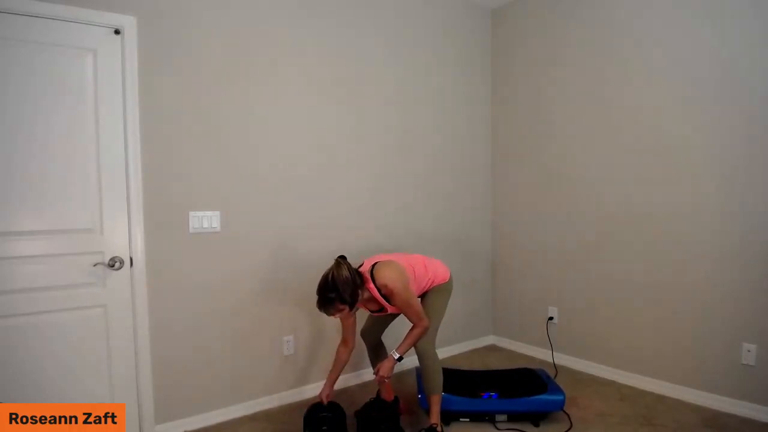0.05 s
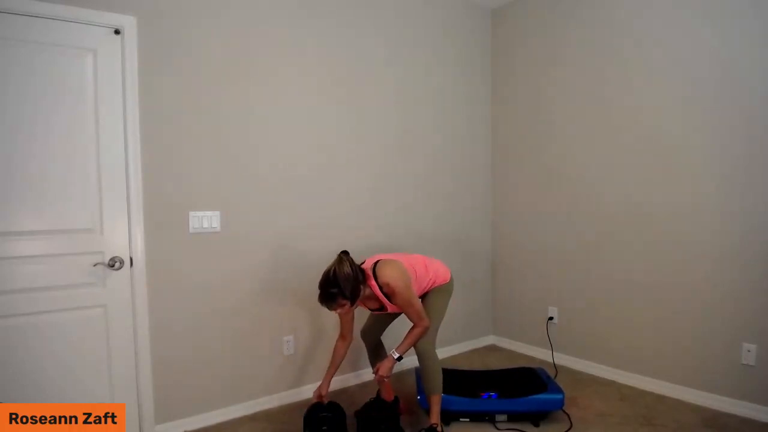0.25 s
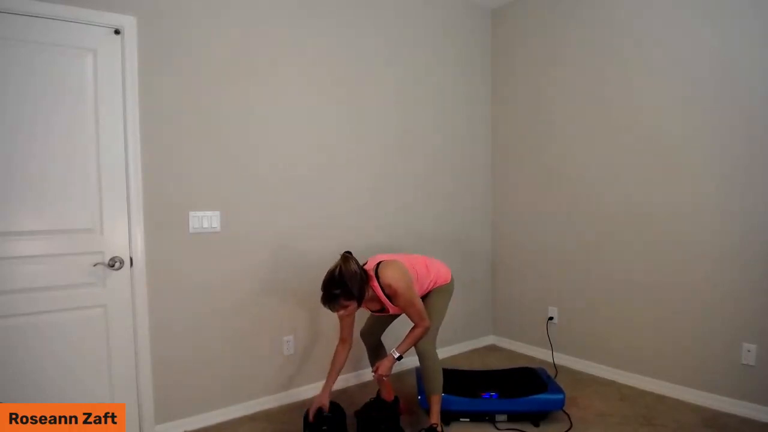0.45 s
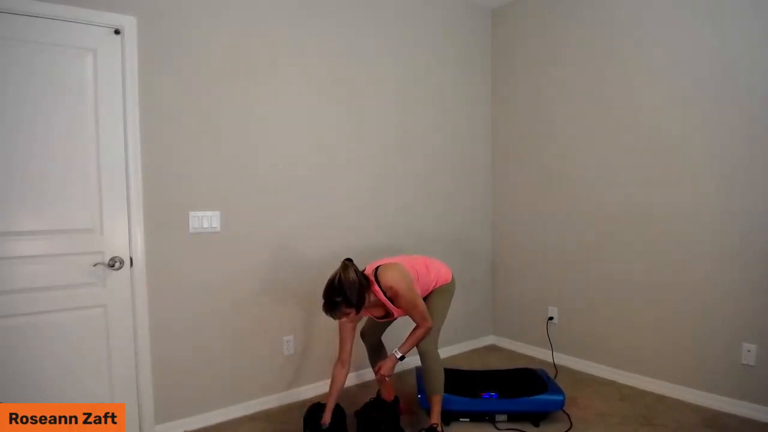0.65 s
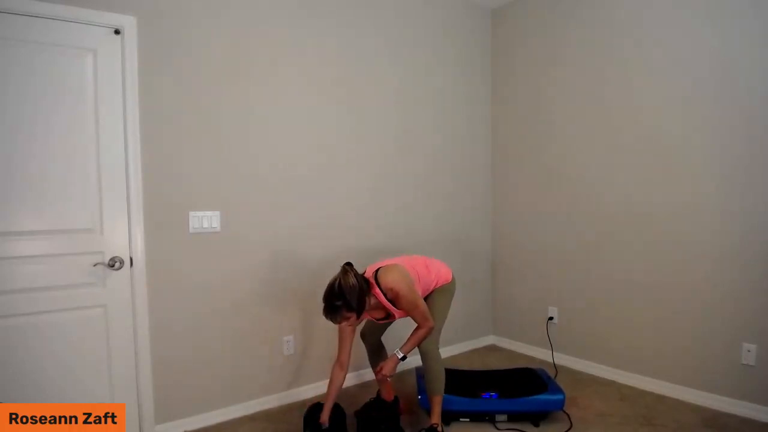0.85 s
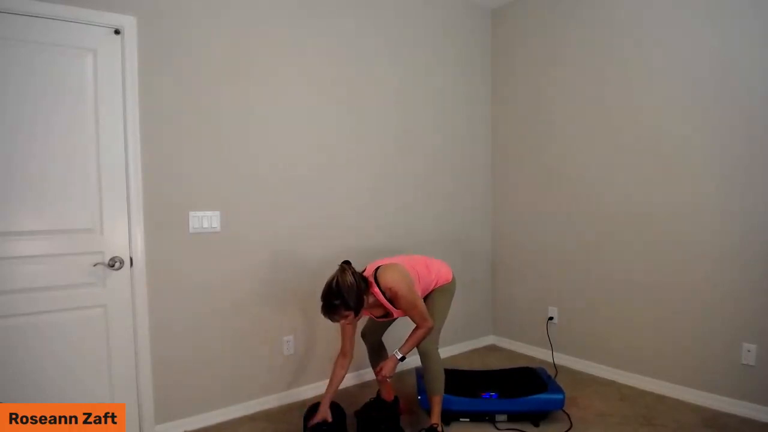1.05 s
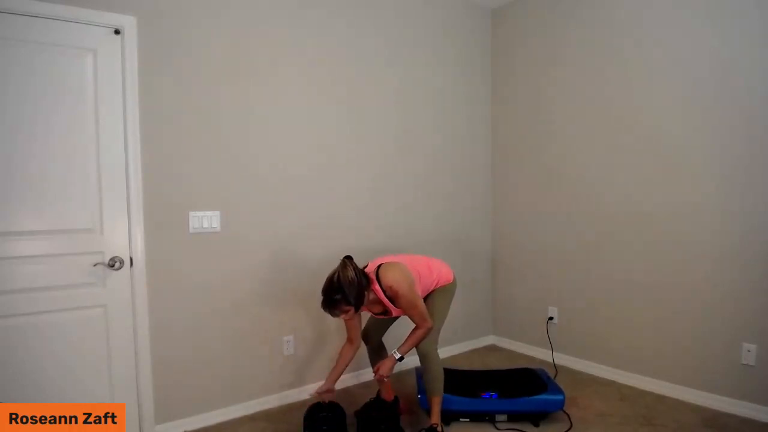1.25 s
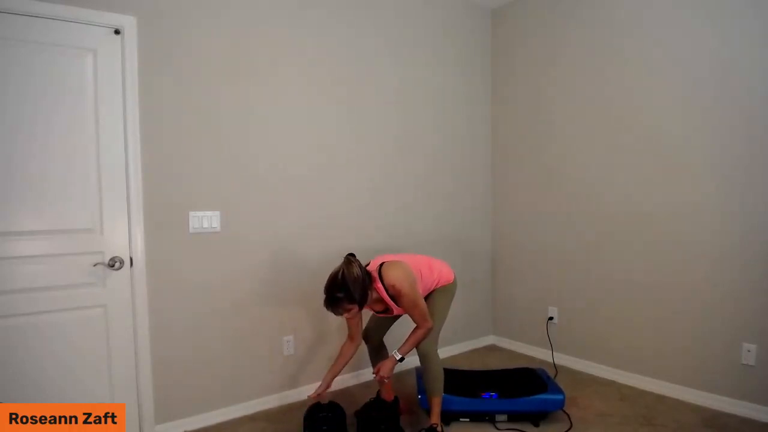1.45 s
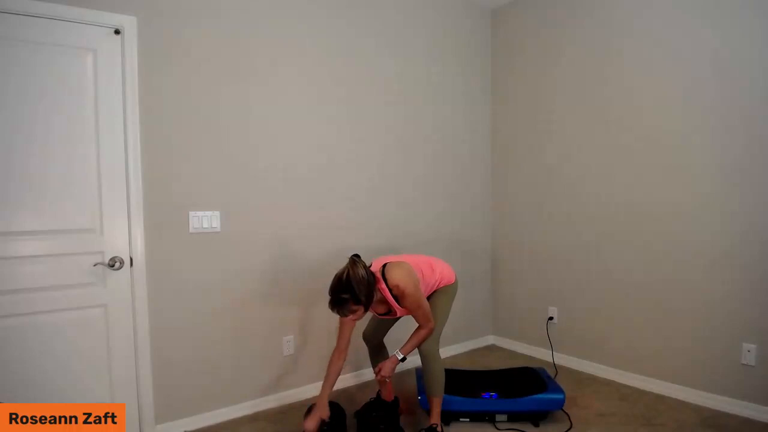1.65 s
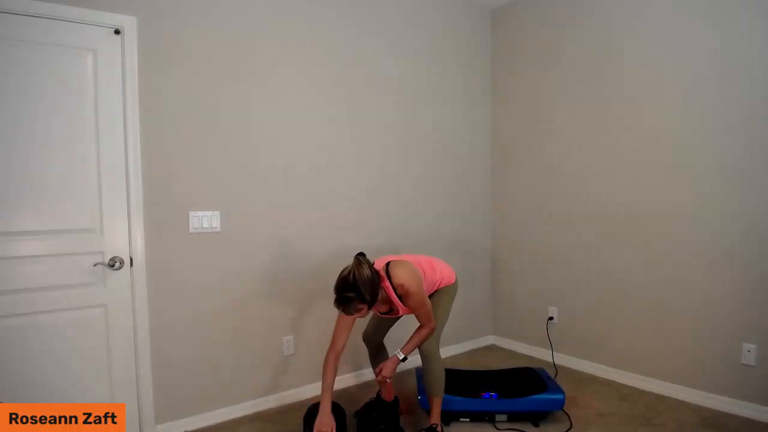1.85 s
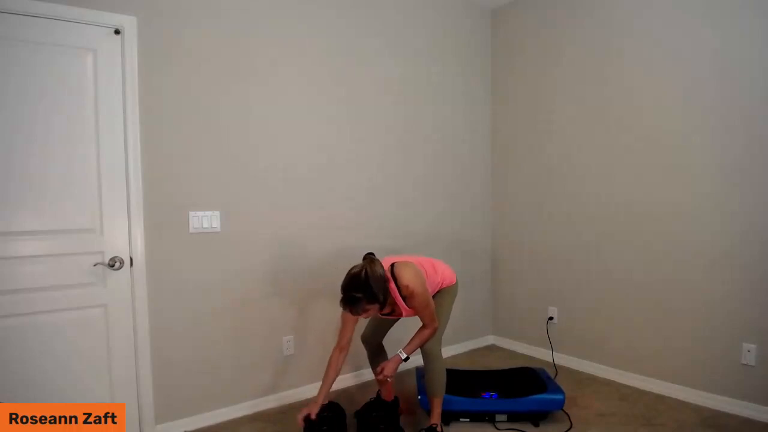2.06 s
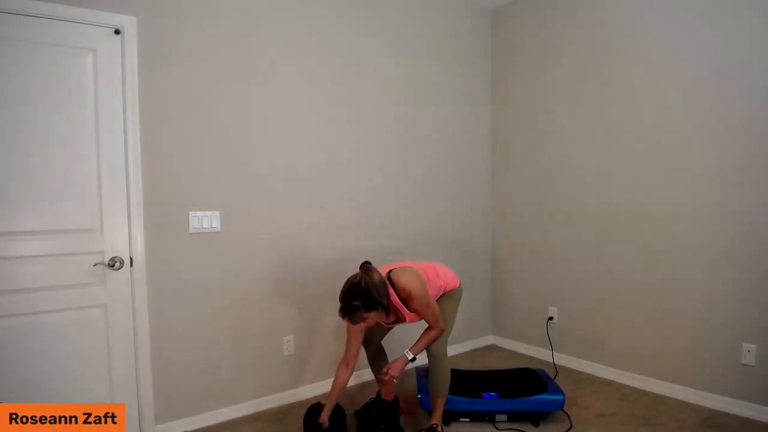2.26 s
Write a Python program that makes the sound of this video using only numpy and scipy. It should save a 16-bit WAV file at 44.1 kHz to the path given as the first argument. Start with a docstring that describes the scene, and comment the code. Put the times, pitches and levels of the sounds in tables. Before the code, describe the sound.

Hard plastic-and-steel clicks of a dumbbell weight selector, a few metres from the microphone in an empty echoing room; soft ticks between, the last two snaps loudest, echoes trimmed by noise suppression, very faint hush beneath.

```python
"""Dumbbell dial in a bare room

The selector dial of an adjustable dumbbell turns in its cradle, a few metres off in a bare, echoing room.
Each detent is a quick cluster of plastic-and-steel contacts: chattering noise that cracks and rings the body.
Faint tones with an octave above squeak between them; dull decaying sines thump through the floor.
The dial's echoes are dying noise; the recorder's noise suppressor shortens the quiet end of every echo.
A low, flickering background hush lies under it all, and the top of the treble is cut."""
import sys
import numpy as np
from scipy import signal
from scipy.fft import rfft, irfft
from scipy.io import wavfile
from scipy.ndimage import uniform_filter1d

SR = 44100
rng = np.random.default_rng(int(sys.argv[2]) if len(sys.argv) > 2 else 0)


def persist_wave(psi):
    """Save psi, clipped to +-1, as 16-bit WAV."""
    counts = np.round(np.clip(psi, -1, 1) * 32767).astype(np.int16)
    wavfile.write(sys.argv[1], SR, np.atleast_2d(counts).T)


N = 101738  # length [samples]

# Contacts of plastic and steel at the dial: (time [s], strength at each of the four CONTACT_HZ [dB],
# ring of the body against the crack [dB], favoured mode [Hz])
CONTACTS = [(.258, -45, -33.5, -17, -29, -46.5, 2440), (.2655, -24.5, -7.5, -6, -9.5, -37.5, 2740),
            (.284, -12.5, -17.5, -25, -11.5, -26.5, 926), (.3, -26.5, -32.5, -18.5, -25, -35.5, 584),
            (.444, -45.5, -36, -38.5, -37.5, -18.5, 2050), (.53, -39.5, -22, -34, -34, -34.5, 2560),
            (.544, -32, -39.5, -18.5, -36, -30, 2760), (.566, -36.5, -31, -50, -30.5, -25, 1490),
            (.6, -40.5, -58, -59, -63, -26, 3100), (.835, -27, -55, -41.5, -70, -40.5, 530),
            (.911, -34.5, -34.5, -25, -34.5, -33, 2260), (.919, -20.5, -17.5, -21.5, -17, -26, 1285),
            (.926, -23, -40, -13, -29, -41.5, 530), (.955, -18, -41, -35, -30.5, -33, 530),
            (1.451, -27.5, -14.5, -29, -18.5, -24, 1490), (1.458, -3.5, 2.5, -3, -2.5, -36, 2660),
            (1.464, -18.5, -12, -15, -11.5, -25.5, 3640), (1.55, -14.5, -32, -28.5, -23, -37, 708),
            (1.903, -60.5, -45, -30, -43.5, -42, 1990), (1.909, -28.5, -6, -64, -26, -29, 1285),
            (1.914, -1.5, 3, 0.5, -6.5, -35.5, 2370), (1.923, -5.5, -7.5, -16, -6, -27.5, 727)]
# Where each contact's four strengths apply: (frequency [Hz])
CONTACT_HZ = [650, 1400, 2700, 8000]
# Modes that plates and cradle ring with: (frequency [Hz], relative level [dB], time to fall 60 dB [s])
BODY_MODES = [(530, -2, .06), (624, -1, .05), (708, -1, .06), (926, -6, .15), (1285, -4, .07),
              (1490, -4, .05), (2050, -4, .05), (2280, -3, .04), (2440, -3, .05), (2560, -3, .05),
              (2860, -5, .04), (3050, -7, .06), (3280, -5, .07), (3640, -8, .04)]
# Colour of crack and ring as they radiate: (frequency [Hz], relative level [dB])
RADIATION = [(60, -39.5), (300, -18), (420, -7), (520, 11), (800, 13.5), (1000, 8.5), (1800, 9.5),
             (2400, 15), (3500, 11), (5300, 5.5), (6500, 7.5), (8000, -1), (11000, -2.5), (16000, -9)]
# Squeaks of the mechanism: (start [s], rise [s], hold [s], pitch [Hz], level [dB], octave above pitch [dB])
SQUEAKS = [(1.06, .025, .055, 1385, -48, 0), (1.66, .13, .04, 1399, -66, 23)]
# Dull thumps through the floor: (time [s], level [dB])
THUMPS = [(.285, -46.5), (.93, -58), (1.457, -56.5), (1.914, -25.5)]
# Echo time of the room: (frequency [Hz], time to fall 60 dB [s])
ROOM_T60 = [(100, 0.41), (250, 1), (600, 0.44), (2000, 0.67), (5000, 0.38), (8000, 0.38), (12000, 0.44),
            (16000, 0.17)]
# Colour of the room's background: (frequency [Hz], relative level [dB per Hz])
HUSH_COLOUR = [(15, -59), (25, -37.5), (59, -27), (115, -5), (293, -10), (383, -18.5), (475, -11.5),
               (811, -22), (879, -20), (2700, -27.5), (15000, -60.5)]
# Level under which the suppressor starts to cut: (frequency [Hz], level [dB per half octave])
GATE = [(200, -42.5), (700, -50.5), (2500, -33.5), (6000, -85.5), (14000, -35.5)]

# Tiny impacts swell up to each contact, then die
CHATTER_PER_S, CHATTER_SPREAD_DB = 2500, 4.5
CHATTER_LEAD_S, CHATTER_DECAY_S = 0.0016, 0.0015  # time constants
CRACK_DB, MODE_SPREAD_DB = 9, 2.5
# Modes away from the favoured one are struck less, down to a limit
FALL_DB_PER_OCTAVE, FALL_MOST_DB = 50, 13
SQUEAK_FALL_S, SQUEAK_WOBBLE = 0.03, 0.0015  # time constant; pitch spread as a fraction
THUMP_HZ, THUMP_DECAY_S = 120, 0.004
ROOM_DB, ROOM_BUILD_S = 7.5, 0.0081
EARLY_DB, EARLY_S = 13, 0.022  # extra level of the first echoes, and its fading time constant
HUSH_DB, HUSH_FLICKER_DB, HUSH_SWELL_DB = -63, 2, 2
GATE_SLOPE, GATE_SMOOTH_S = 0.63, 0.01  # dB of cut per dB of shortfall; level averaging time
CEILING = 1.3  # amplitude the rounded peaks approach
CUTOFF_HZ = 16350


def detents():
    """Each contact's chatter drives a broad crack and the modes, struck a little differently every time."""
    size, lead = 16384, 1024  # samples per contact, and those ahead of it
    out = np.zeros(N)
    t = np.arange(size) / SR
    hz = np.arange(size // 2 + 1) * SR / size
    modes = np.array([rfft(from_db(db - 60 * t / t60) * np.sin(2 * np.pi * f * t))
                      for f, db, t60 in BODY_MODES])
    mode_hz = np.array(BODY_MODES)[:, 0]
    radiation = causal(np.log(from_db(CRACK_DB + at_hz(RADIATION, hz))))
    since = t - lead / SR
    shape = np.exp(np.where(since < 0, since / CHATTER_LEAD_S, -since / CHATTER_DECAY_S))
    for s, *strength, ring_db, favoured_hz in CONTACTS:
        impacts = rng.random(size) < CHATTER_PER_S / SR
        hits = impacts * from_db(CHATTER_SPREAD_DB * rng.standard_normal(size))
        hits = hits * rng.choice([-1, 1], size) * shape
        colour = causal(np.log(from_db(at_hz(list(zip(CONTACT_HZ, strength)), hz))))
        octaves_away = np.abs(np.log2(mode_hz / favoured_hz))
        away_db = np.minimum(FALL_DB_PER_OCTAVE * octaves_away, FALL_MOST_DB)
        mode_db = ring_db - away_db + MODE_SPREAD_DB * rng.standard_normal(len(BODY_MODES))
        ring = from_db(mode_db) @ modes
        contact = even(hits, width_hz=210) * colour * radiation * (1 + ring)
        add(out, irfft(contact), s - lead / SR)
    return out


def squeaks():
    """A thin stick-slip tone and its octave swell, hold and die."""
    out, t = np.zeros(N), np.arange(N) / SR
    wobble = 1 + SQUEAK_WOBBLE * drift(33)
    for s, rise, hold, hz, db, octave_db in SQUEAKS:
        swell = np.clip((t - s) / rise, 0, 1) ** 2
        fall = np.exp(-np.maximum(t - s - rise - hold, 0) / SQUEAK_FALL_S)
        phase = 2 * np.pi * hz * np.cumsum(wobble) / SR
        tone = np.sin(phase) + from_db(octave_db) * np.sin(2 * phase)
        out += from_db(db) * swell * fall * tone
    return out


def thumps():
    """Each thump is one damped low push."""
    out, t = np.zeros(N), np.arange(SR // 10) / SR
    push = np.sin(2 * np.pi * THUMP_HZ * t) * np.exp(-t / THUMP_DECAY_S)
    for s, db in THUMPS:
        add(out, from_db(db) * push, s)
    return out


def room(x):
    """Dense echoes build up fast and die band by band, the early ones stronger."""
    t, echo = np.arange(N) / SR, 0
    onset = (1 - np.exp(-t / ROOM_BUILD_S)) * from_db(EARLY_DB * np.exp(-t / EARLY_S))
    for hz, band in bands(rng.standard_normal(N)):
        echo = echo + band * onset * from_db(-60 * t / at_hz(ROOM_T60, hz))
    response = from_db(ROOM_DB) * irfft(even(echo, width_hz=75), N)
    return signal.fftconvolve(x, response)[:N]


def hush():
    """The room's background swells as a whole, most in the treble, and flickers band by band."""
    noise = bands(rng.standard_normal(N))
    swell_db = HUSH_SWELL_DB * drift(5.4)
    background = np.zeros(N)
    for hz, band in noise:
        swell_share = min(hz / 1500, 1)
        level_db = at_hz(HUSH_COLOUR, hz) + swell_share * swell_db + HUSH_FLICKER_DB * drift(20)
        background += band * from_db(level_db)
    return from_db(HUSH_DB) * rms_one(background)


def suppress(x):
    """The noise suppressor turns each band down by a share of its shortfall under the gate."""
    out = np.zeros(N)
    for hz, band in bands(x):
        power = uniform_filter1d(band ** 2, int(GATE_SMOOTH_S * SR))
        level_db = 10 * np.log10(np.maximum(power, 1e-16))
        out += band * from_db(GATE_SLOPE * np.minimum(level_db - at_hz(GATE, hz), 0))
    return out


def from_db(db):
    """Decibels to gain."""
    return 10 ** (np.asarray(db) / 20)


def rms_one(x):
    """Scale to unit rms."""
    return x / np.sqrt(np.mean(x ** 2) + 1e-20)


def at_hz(points, hz):
    """Read a table on a log-frequency axis."""
    table_hz, values = np.array(points)[:, 0], np.array(points)[:, 1]
    return np.interp(np.log(np.maximum(hz, 1)), np.log(table_hz), values)


def add(out, x, s):
    """Mix a sound in at a time in seconds."""
    i = int(s * SR)
    out[i:i + len(x)] += x[:N - i]


def drift(rate_hz):
    """Slow random wander of unit rms: noise through a two-pole low-pass."""
    r = np.exp(-2 * np.pi * rate_hz / SR)
    wander = signal.lfilter([1], [1, -2 * r, r * r], rng.standard_normal(N + SR))
    return rms_one(wander[SR:])  # the first second lets the filter settle


def bands(x):
    """Split into overlapping half-octave bands that sum back to the whole below 18 kHz: (centre Hz, band)."""
    spectrum = rfft(x)
    hz = np.arange(N // 2 + 1) * SR / N
    steps = 2 * np.log2(np.maximum(hz, 25) / 25)  # half octaves above 25 Hz
    for k in range(20):
        weight = np.clip(1 - np.abs(steps - k), 0, 1)
        yield 25 * 2 ** (k / 2), irfft(spectrum * weight, N)


def causal(log_gain):
    """Minimum-phase response for a log magnitude, by folding its cepstrum."""
    cepstrum = irfft(log_gain)
    half = len(cepstrum) // 2
    cepstrum[1:half] *= 2
    cepstrum[half + 1:] = 0
    return np.exp(rfft(cepstrum))


def even(x, width_hz):
    """Spectrum of a random burst, levelled to unit height on average over a width."""
    spectrum = rfft(x)
    power = uniform_filter1d(np.abs(spectrum) ** 2, int(width_hz * len(x) / SR))
    return spectrum / np.sqrt(power + 1e-20)


def scene():
    """The dial with its room echo, and the thumps and squeaks without any."""
    dial = detents()
    return (dial + room(dial) + thumps() + squeaks())[None]


def record(dry):
    """Suppress the scene, add the background after it, round the peaks and cut the top."""
    x = suppress(dry[0]) + hush()
    rounded = CEILING * np.tanh(x / CEILING)
    low_pass = signal.cheby2(12, 70, CUTOFF_HZ, fs=SR, output="sos")
    return signal.sosfilt(low_pass, rounded)[None]


dry = scene()
out = record(dry)
persist_wave(out)
```